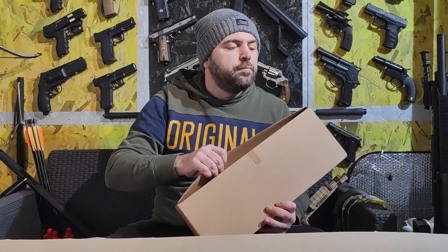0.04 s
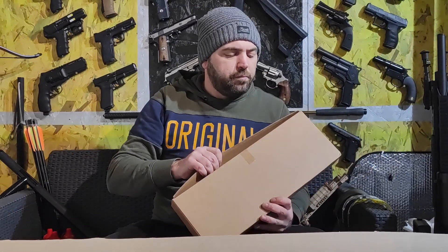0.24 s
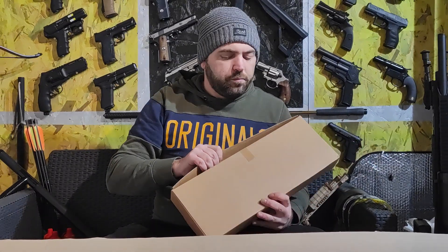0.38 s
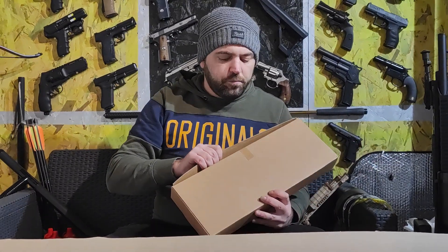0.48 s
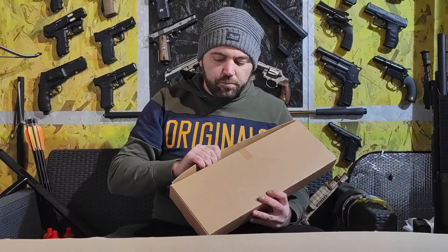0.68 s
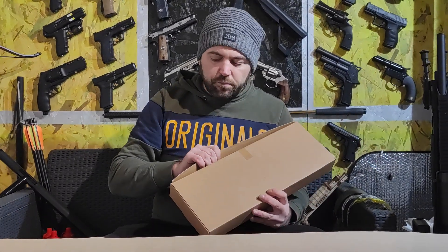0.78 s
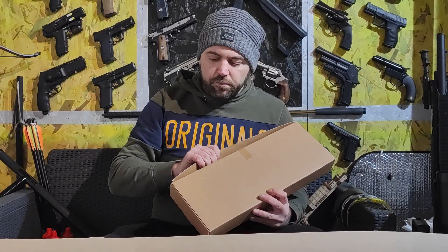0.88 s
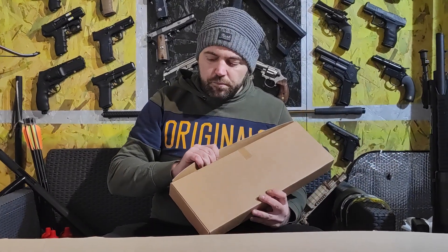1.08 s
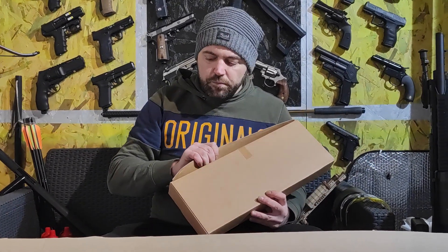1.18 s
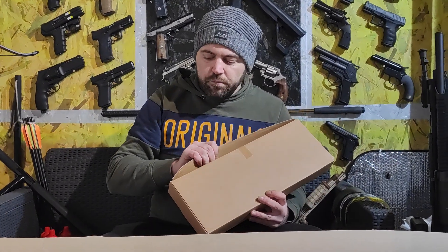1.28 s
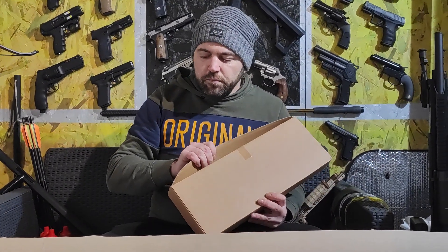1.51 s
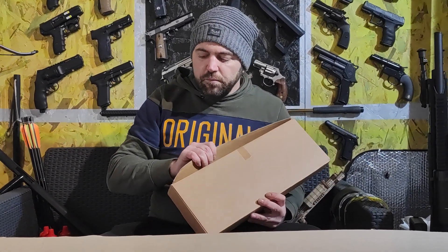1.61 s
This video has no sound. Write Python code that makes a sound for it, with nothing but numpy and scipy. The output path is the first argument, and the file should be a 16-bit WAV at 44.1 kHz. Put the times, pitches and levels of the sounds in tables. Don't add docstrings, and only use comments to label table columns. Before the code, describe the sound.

Close stereo sound of hands shifting an empty-sounding cardboard box: faint rustle first, then low dull bumps and crisp flap snaps, rubbing that fades, and later a few soft taps over faint hiss and deep hum.

```python
import sys
import numpy as np
from scipy import signal
from scipy.fft import rfft, irfft
from scipy.io import wavfile
from scipy.ndimage import uniform_filter1d

SR = 44100
rng = np.random.default_rng(int(sys.argv[2]) if len(sys.argv) > 2 else 0)


def field_ratio(decibels):
    return 10 ** (np.asarray(decibels, dtype=float) / 20)


def output_pcm(signal):
    pcm = np.clip(np.atleast_2d(signal).T, -1, 1) * 32767
    wavfile.write(sys.argv[1], SR, np.round(pcm).astype(np.int16))


N = 72765
LEFT_RIGHT = np.array([[1], [-1]])

# pitch in Hz, level in dB, t60 in seconds.
PANELS = [(97, -4.5, 0.61), (145.8, -34, 0.042), (155, -0.5, 0.052), (210, -4.5, 0.051), (220, -8, 0.085),
          (260, -2, 0.063), (315, -1.5, 0.057), (387.4, 5, 0.027), (445, -3.5, 0.016), (487.5, -5.5, 0.087),
          (551, -5.5, 0.13), (700, 0.5, 0.029), (915, 6, 0.011), (950, 0.5, 0.073)]


def read(points, hz):
    f, value = np.transpose(points)
    return np.interp(np.log(hz + 1), np.log(f + 1), value)


def evened(x):
    return x / np.sqrt(np.mean(x ** 2) + 1e-20)


def ring(x, hz, width_hz):
    radius = np.exp(-np.pi * width_hz / SR)
    w = 2 * np.pi * hz / SR
    return signal.lfilter([0, np.sin(w)], [1, -2 * radius * np.cos(w), radius ** 2], x)


def sway():
    hum_hz, width_hz, level_db = 24.1, 10.2, -63.5
    noise = rng.standard_normal((2, N))
    hum = ring(ring(noise, hum_hz, width_hz), hum_hz, width_hz)
    return field_ratio(level_db) * evened(hum[0] + 0.22 * hum[1] * LEFT_RIGHT)


def tone():
    # frequency in Hz, level in dB.
    floor_colour = [(30, -7.5), (60, -7), (200, -15.5), (300, -17), (930, -28.5), (3000, -29), (9100, -49),
                    (15500, -38)]
    # frequency in Hz, left-right likeness from -1 to 1.
    likeness = [(60, 0.54), (180, 0.77), (550, 0.32), (1650, -0.043), (4970, -0.029), (15000, -0.12)]
    level_db = -61.5
    hz = np.fft.rfftfreq(2048, 1 / SR)
    a, b, c, d, patches = rng.standard_normal((N // 512 + 5, 1025, 5)).T
    patches = evened(uniform_filter1d(uniform_filter1d(patches, 30, 0), 6, 1))
    patch_db = 1.16 + 1.57 * (hz[:, None] > 5500)
    same = np.clip(read(likeness, hz), -1, 1)[:, None]
    left = a + 1j * b
    right = same * left + np.sqrt(1 - same ** 2) * (c + 1j * d)
    gain = field_ratio(read(floor_colour, hz)[:, None] + patch_db * patches)
    hiss = signal.istft(np.array([left, right]) * gain, nperseg=2048, noverlap=1536)[1][:, :N]
    return field_ratio(level_db) * evened(hiss)


def room(x):
    t60_s, dull_hz, taps_per_s = 0.26, 3280, 2000
    bass_db = -3
    t = np.arange(SR // 2) / SR
    taps = rng.choice([-1., 1.], (3, len(t))) * (rng.random((3, len(t))) < taps_per_s / SR)
    taps = taps * field_ratio(-60 * t / t60_s) * (t > .006)
    low = signal.lfilter(*signal.butter(2, 600, fs=SR), taps)
    bass = field_ratio(bass_db) * (low[2] + low[:2])
    tail = signal.lfilter(*signal.butter(1, dull_hz, fs=SR), taps[:2] - low[:2] + bass)
    return signal.fftconvolve(x, tail / np.linalg.norm(taps[0]), axes=1)[:, :N]


def slips():
    # frequency in Hz, density in dB per Hz.
    paper_colour = [(290, -4), (500, -3.5), (620, -12.5), (716, -8), (1770, -11.5), (2100, -7),
                    (5670, -19.5), (9110, -28), (15500, -32.5)]
    # pitch in Hz, width in Hz, level in dB.
    board_rings = [(950, 320, -7), (2090, 770, -2), (3010, 95, -15.5), (3255, 24, 2), (5300, 730, -31)]
    slips_per_s, spread_db, shared, rings_db = 5000, 0.5, 0.12, -12
    happens = rng.random((2, N)) < slips_per_s / SR
    z = rng.standard_normal((2, N)) * happens * field_ratio(spread_db * rng.exponential(1, (2, N)))
    z[1] += shared * np.roll(z[0], 9)
    hz = np.fft.rfftfreq(N, 1 / SR)
    z = evened(irfft(rfft(z) * field_ratio(read(paper_colour, hz)) * (hz > 450), N))
    rings = sum(field_ratio(db) * np.sqrt(width) * ring(z, f, width) for f, width, db in board_rings)
    return evened(z + field_ratio(rings_db) * evened(rings))


def tilted(x, level_db, tilt_db, treble_db):
    treble_hz = 3450
    hz, t, z = signal.stft(x, SR, nperseg=128)
    at = np.minimum((t * SR).astype(int), N - 1)
    tilt = np.log2((hz[:, None] + 300) / 3000) * tilt_db[at]
    treble = np.log2(np.maximum(hz[:, None] / treble_hz, 1)) * treble_db[at]
    return signal.istft(z * field_ratio(tilt + treble), SR, nperseg=128)[1][:, :N] * field_ratio(level_db)


def skid():
    start_s, level_db, scrape_hz, width_hz, t60_s = .008, -61, 2900, 400, .3
    u = np.arange(N) / SR - start_s
    env = (u > 0) * field_ratio(level_db - 60 * np.maximum(u, 0) / t60_s)
    return env * evened(ring(ring(slips(), scrape_hz, width_hz), scrape_hz, width_hz))


def favour(hz, centre_hz):
    spread_db = 30.5
    least_db = -32
    if hz in (PANELS[0][0], PANELS[-1][0]):
        least_db = -26
    return field_ratio(-spread_db * np.log2(hz / centre_hz) ** 2) + field_ratio(least_db)


def box(force):
    rise_cycles, lean = 0.65, 0.024
    out, t = np.zeros((2, N)), np.arange(1200) / SR
    for (hz, db, t60), side in zip(PANELS, rng.choice([-1, 1], len(PANELS))):
        swell = np.sin(np.pi * np.minimum(hz * t / (2 * rise_cycles), 1)) ** 2
        contact = np.sin(2 * np.pi * hz * t) * swell
        push = signal.oaconvolve(force(hz), 2 * contact / abs(contact).sum())[:N]
        y = field_ratio(db) * ring(push, hz, np.log(1000) / np.pi / t60)
        quarter_late = np.roll(y, round(SR / hz / 4))
        out += y + lean * side * np.sqrt(hz / 200) * LEFT_RIGHT * quarter_late
    return out


def slide():
    # time in seconds, pressure in dB, brightness in dB per octave,
    # panel shake in dB, panel pitch in Hz.
    palm_moves = [(0, -66.5, -0.5, -71, 380), (.05, -65, 4, -65.5, 400), (.125, -69.5, 5.5, -69.5, 400),
                  (.2, -62, 4.5, -74, 497), (0.331, -63, 0.5, -68, 240), (0.362, -55.5, 0, -52, 256),
                  (0.409, -58, 0, -51, 263), (0.45, -56, 1.5, -53.5, 260), (.51, -56.5, 2.5, -57.5, 335),
                  (0.579, -54.5, 4.5, -63, 262), (0.609, -64, 4.5, -70.5, 262), (0.647, -72, 4, -79, 255),
                  (.72, -74, 0, -72.5, 260), (1.25, -108, 19, -65.5, 292), (1.328, -85, 13, -62, 317),
                  (1.451, -89, 7, -74.5, 306), (1.65, -69, 3, -70.5, 360)]
    shakes_per_s = 600
    s, db, tilt_db, shake_db, panel_hz = np.transpose(palm_moves)
    t = np.arange(N) / SR
    shake = rng.standard_normal(N) * (rng.random(N) < shakes_per_s / SR)
    centre_hz = np.interp(t, s, panel_hz)
    rumble = evened(box(lambda hz: shake * favour(hz, centre_hz)))
    hiss = tilted(slips(), np.interp(t, s, db), np.interp(t, s, tilt_db), 0 * t)
    return hiss + rumble * field_ratio(np.interp(t, s, shake_db))


def snaps():
    # start in seconds, level in dB, puff t60 in seconds,
    # brightness in dB per octave, extra treble slope in dB per octave.
    flap_snaps = [(.005, -55, 0.17, 2.5, 4.5), (0.217, -54.5, 0.27, -6, 7), (.232, -54.5, 0.4, -2.5, 3.5),
                  (0.2776, -48, 0.1, 2, -12), (0.286, -49.5, 0.11, 5, -13), (0.296, -50, 0.079, 2.5, -19),
                  (0.308, -56, 0.062, -2, -18), (0.374, -55, .07, 3, -4), (0.384, -62, 0.15, -4.5, 6),
                  (.4707, -72, .05, 11, 0), (1.085, -70.5, 0.15, -4.5, 5), (1.181, -67, 0.073, -8.5, -9),
                  (1.297, -59.5, 0.06, -11.5, -14), (1.301, -61, 0.22, -2, 3.5),
                  (1.381, -63, 0.055, 5.5, -2)]
    rise_s, crack_db, crack_s = 0.0009, -0.5, 0.0021
    t, power, slopes = np.arange(N) / SR, np.full(N, 1e-14), np.zeros((2, N))
    for s, db, t60, *slopes_db in flap_snaps:
        u = np.maximum(t - s, 0)
        puff = (1 - np.exp(-u / rise_s)) * field_ratio(db - 60 * u / t60)
        crack = 1 + field_ratio(crack_db) * np.exp(-u / crack_s)
        power += (puff * crack) ** 2
        slopes[:, t > s - .002] = np.array(slopes_db)[:, None]
    return tilted(slips(), 10 * np.log10(power), *slopes)


def knocks():
    # start in seconds, peak in dB, pitch in Hz, t60 in seconds.
    panel_knocks = [(.005, -51, 2960, 0.0073), (.058, -49, 395, 0.034), (0.081, -54, 418, 0.071),
                    (0.2183, -34, 415, 0.044), (0.2203, -26.5, 200, 0.053), (.22, -35.5, 97, 0.21),
                    (.224, -41.5, 458, 0.049), (.229, -33, 331.5, 0.034), (.236, -21.5, 232, 0.039),
                    (0.256, -22, 260, 0.021), (0.266, -34, 150, 0.048), (0.2774, -36.5, 2230, 0.0041),
                    (.279, -31.5, 246, 0.067), (.281, -42, 97, 0.078), (.288, -36.5, 256, 0.042),
                    (0.289, -43.5, 448, 0.032), (0.3, -33, 215.8, .05), (0.315, -29.5, 225, 0.034),
                    (0.338, -45, 230, 0.035), (.371, -49.5, 2050, 0.015), (0.3729, -38, 205, 0.042),
                    (.379, -52.5, 97, 0.2), (.393, -35, 228, 0.042), (0.413, -47, 200, .05),
                    (.432, -47.5, 240, 0.031), (.476, -48, 278, 0.056), (0.492, -51, 251, 0.037),
                    (.51, -62, 410, 0.036), (0.523, -46, 255, 0.077), (0.563, -48.5, 258, 0.13),
                    (.57, -57.5, 385, 0.091), (0.606, -57.5, 261, 0.1), (1.183, -49, 558.5, 0.049),
                    (1.183, -52, 420, 0.029), (1.212, -58.5, 541, 0.083), (1.2949, -36.5, 282, 0.027),
                    (1.295, -48.5, 112, 0.15), (1.295, -50.5, 1950, 0.0094), (1.297, -57, 2880, 0.0097),
                    (1.3044, -34.5, 356, 0.026), (1.303, -58, 790, 0.051), (1.315, -49, 413, 0.05),
                    (1.326, -52, 482, 0.061), (1.34, -52, 273, 0.049), (1.382, -63, 3670, 0.011)]
    rise_cycles, damp = 0.92, 1.3
    out, t = np.zeros((2, N)), np.arange(SR // 4) / SR
    for (s, db, hz, t60), lean in zip(panel_knocks, rng.uniform(-1.2, 1, len(panel_knocks))):
        env = (1 - np.exp(-t * hz / rise_cycles)) * field_ratio(db + 0.5 - 60 * (t / t60) ** damp)
        knock = env * np.sin(2 * np.pi * hz * t + 0.081 * lean * LEFT_RIGHT)
        part = out[:, round(s * SR):][:, :len(t)]
        part += knock[:, :part.shape[1]]
    return out


def bumps():
    # start in seconds, strength in dB, favoured panel pitch in Hz.
    box_bumps = [(0.143, -55, 363), (0.2178, -41.5, 352), (0.2237, -31, 312), (.25, -43, 350),
                 (.262, -38.5, 420), (0.299, -42, 350), (.35, -52, 232), (1.086, -56, 383),
                 (1.193, -47.5, 423), (1.321, -49.5, 460), (1.351, -64, 424), (1.442, -50, 277),
                 (1.611, -51.5, 292)]
    # start in seconds, strength in
    # dB, favoured panel pitch in Hz.
    hollow_bumps = [(0.226, -47, 950), (0.251, -52, 950), (.283, -45.5, 950), (.3, -47, 950),
                    (.345, -54.5, 950), (0.373, -52, 950), (.388, -50.5, 950), (0.2, -47.5, 700),
                    (.232, -60, 980), (.15, -51.5, 700), (.5, -52.5, 950), (.52, -54.5, 740)]
    s, db, centre_hz = np.concatenate([box_bumps, hollow_bumps]).T

    def force(hz):
        f = np.zeros(N)
        direction = rng.choice([-1, 1, 1], len(s))
        f[np.round(s * SR).astype(int)] = field_ratio(db - 7.5) * favour(hz, centre_hz) * direction
        return f
    return box(force)


def scene():
    background = tone() + sway()
    near = bumps() + snaps() + slide()
    knock = knocks()
    reverb = room(field_ratio(-3.5) * near + field_ratio(-12.5) * knock)
    return background + reverb + skid() + near + knock


def band_limit(x):
    return signal.sosfilt(signal.butter(12, 16480, fs=SR, output="sos"), x)


def record(dry):
    dip_hz, dip_width_hz, dip_db, edge_hz = 8970, 280, -5, 15600
    hz = np.fft.rfftfreq(N, 1 / SR)
    dip = field_ratio(dip_db * np.exp(-((hz - dip_hz) / dip_width_hz) ** 2))
    band = np.clip((edge_hz - hz) / 100, 0, 1)
    return band_limit(irfft(rfft(dry) * dip * band, N))


dry = scene()
out = record(dry)
output_pcm(out)
```